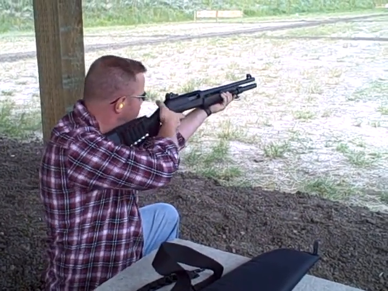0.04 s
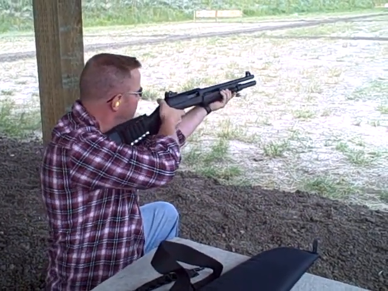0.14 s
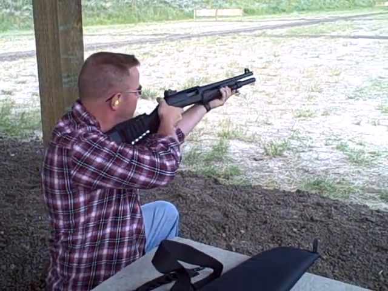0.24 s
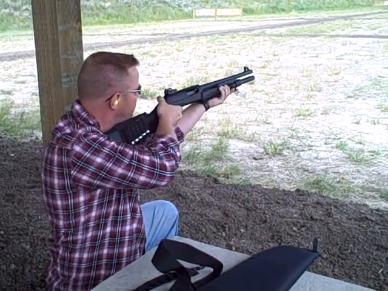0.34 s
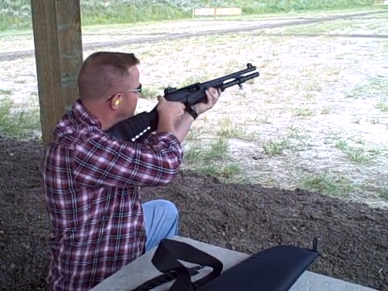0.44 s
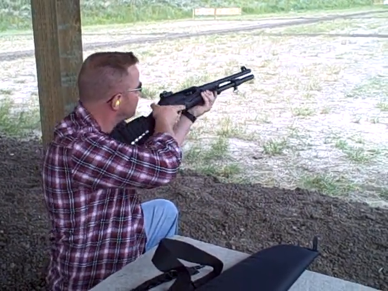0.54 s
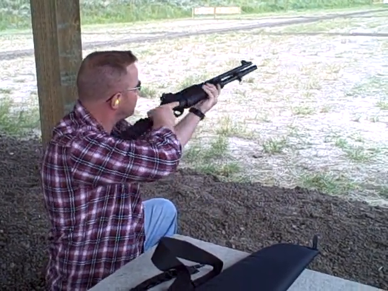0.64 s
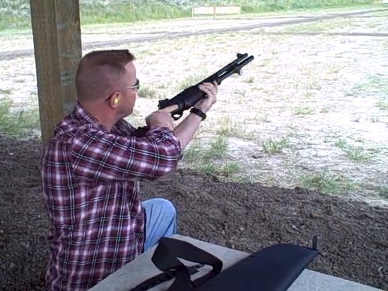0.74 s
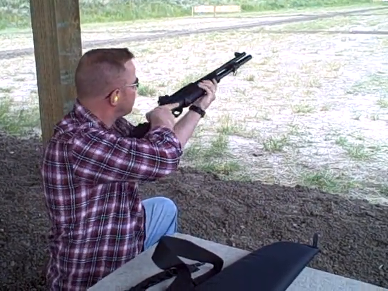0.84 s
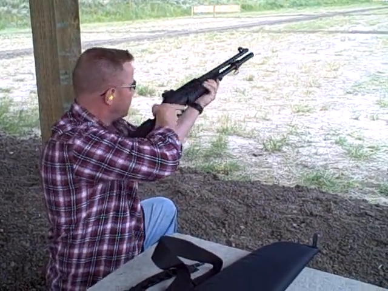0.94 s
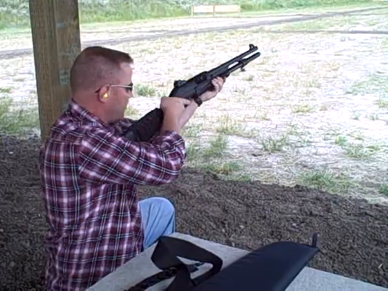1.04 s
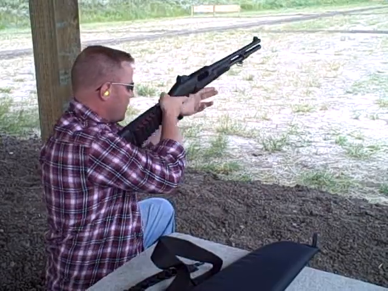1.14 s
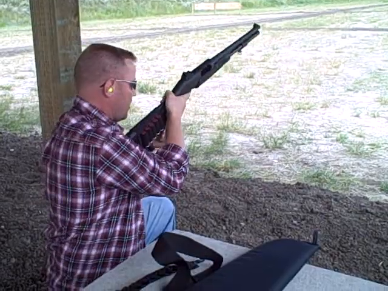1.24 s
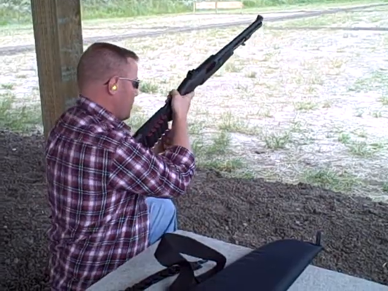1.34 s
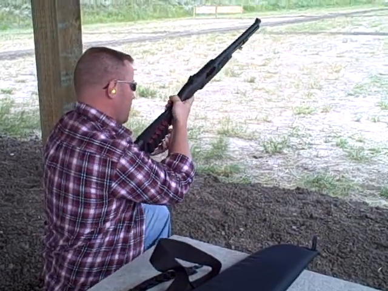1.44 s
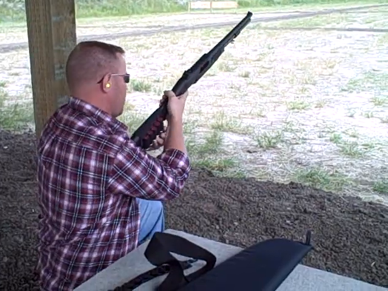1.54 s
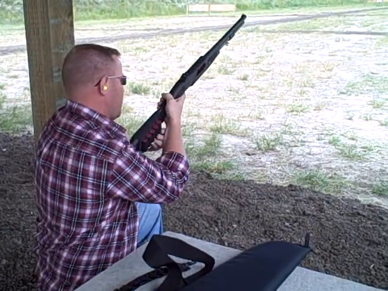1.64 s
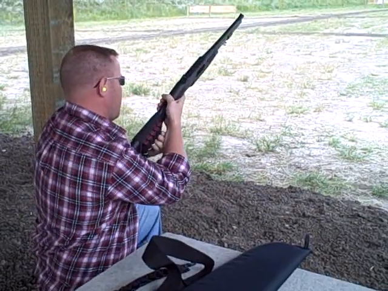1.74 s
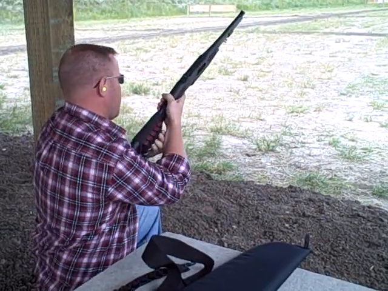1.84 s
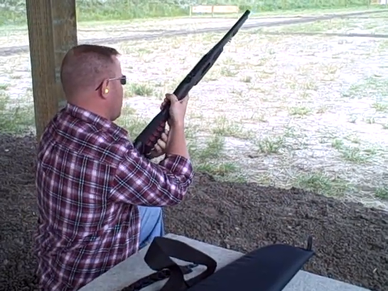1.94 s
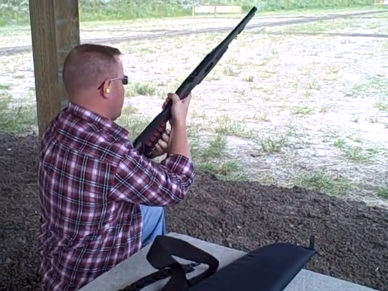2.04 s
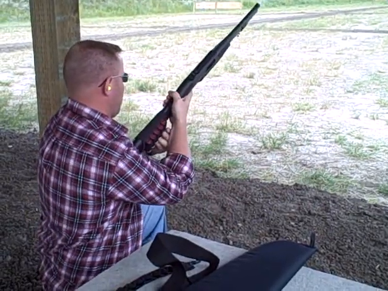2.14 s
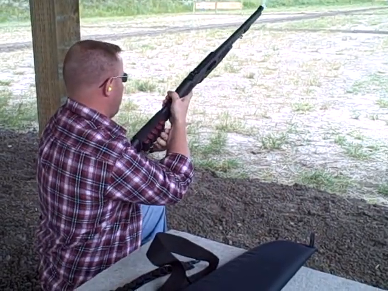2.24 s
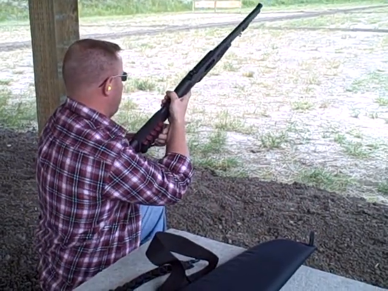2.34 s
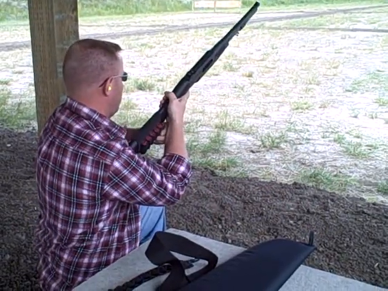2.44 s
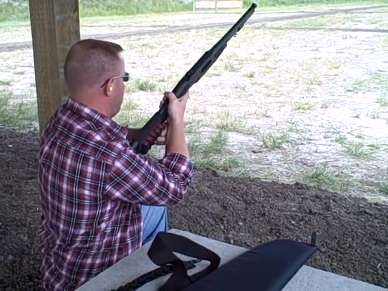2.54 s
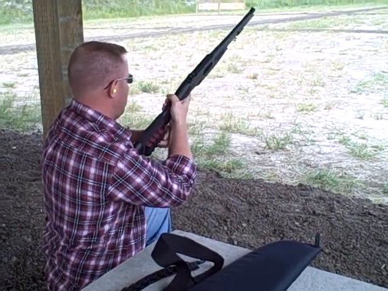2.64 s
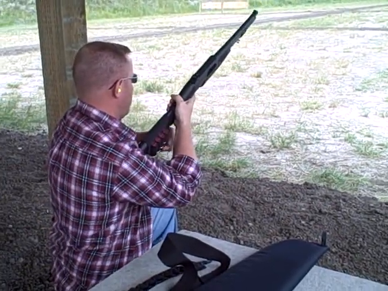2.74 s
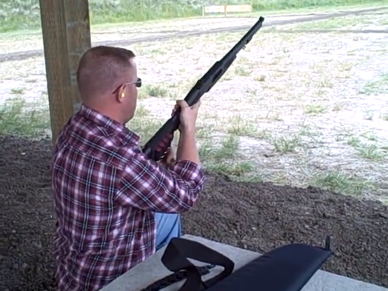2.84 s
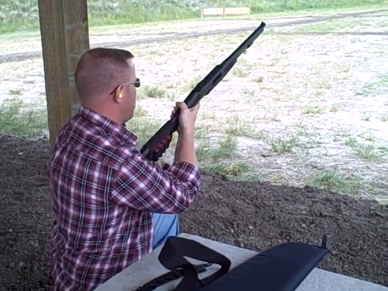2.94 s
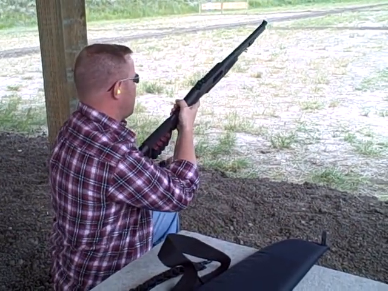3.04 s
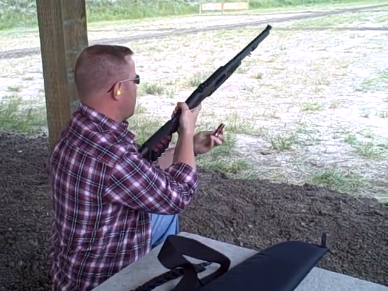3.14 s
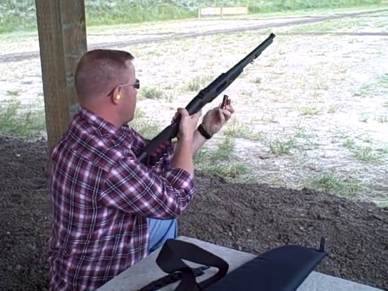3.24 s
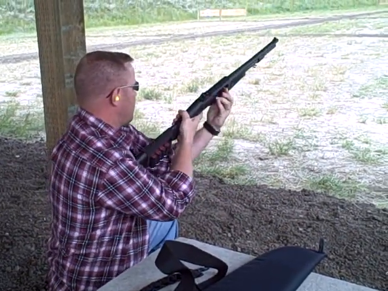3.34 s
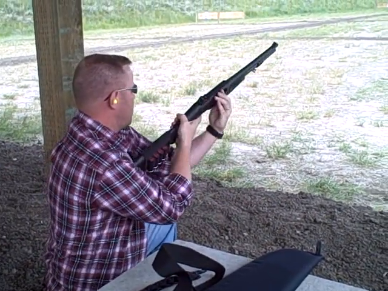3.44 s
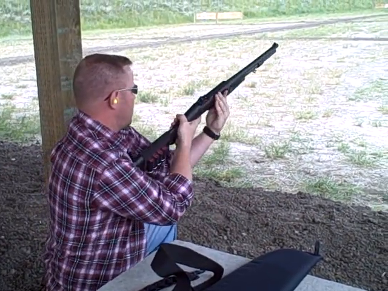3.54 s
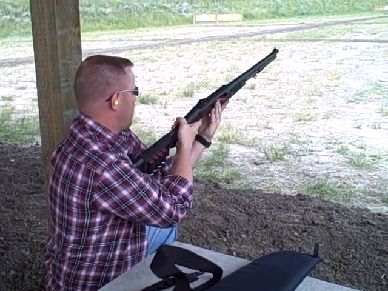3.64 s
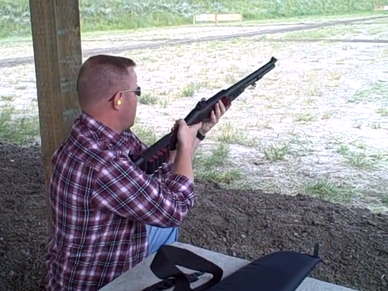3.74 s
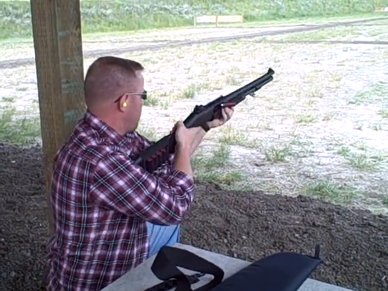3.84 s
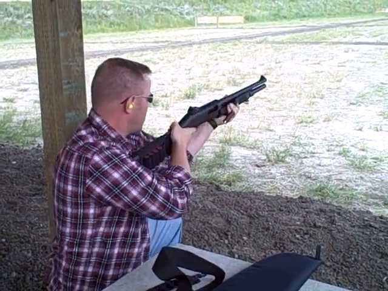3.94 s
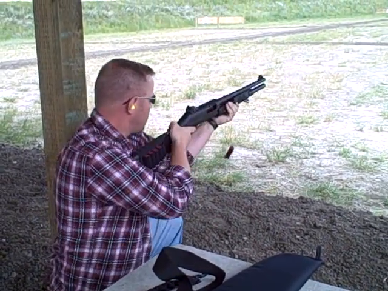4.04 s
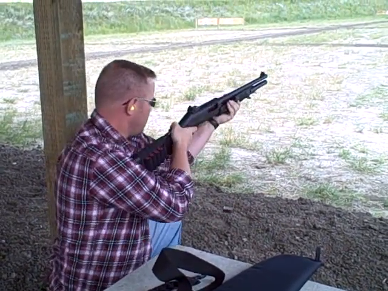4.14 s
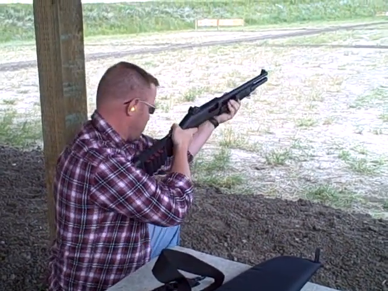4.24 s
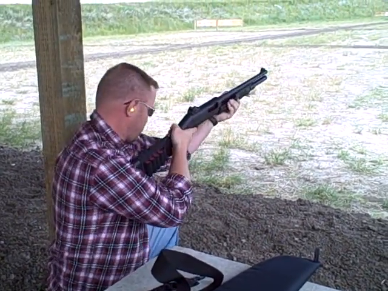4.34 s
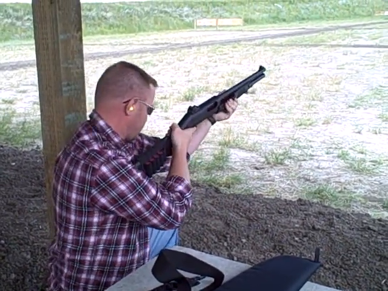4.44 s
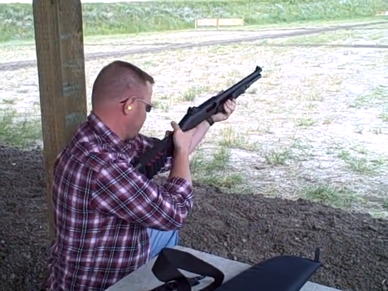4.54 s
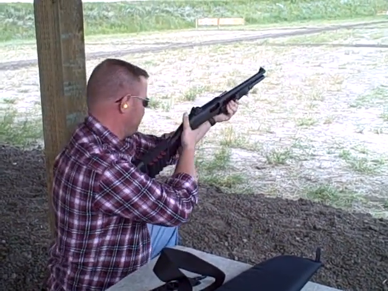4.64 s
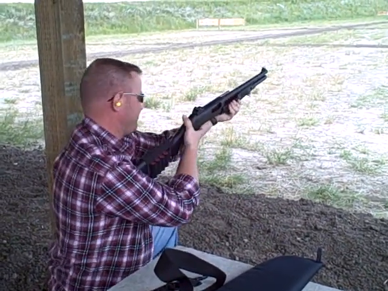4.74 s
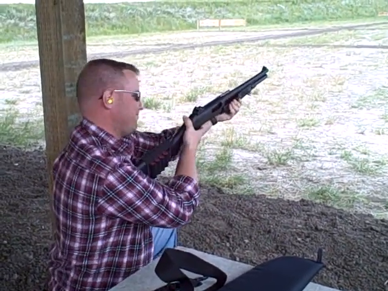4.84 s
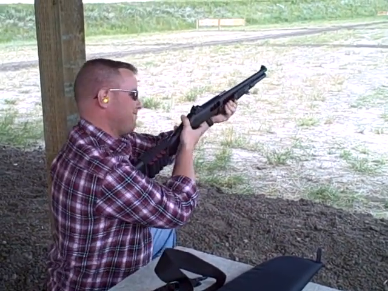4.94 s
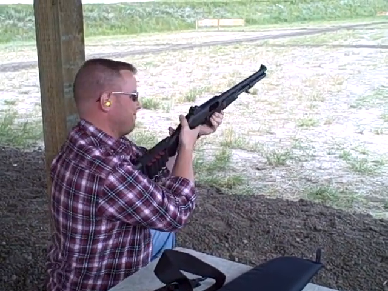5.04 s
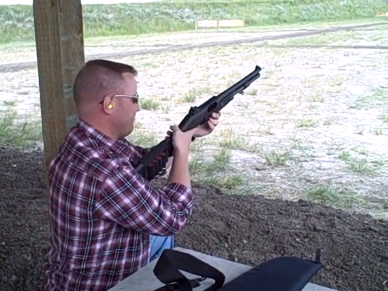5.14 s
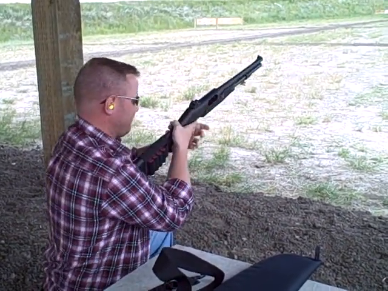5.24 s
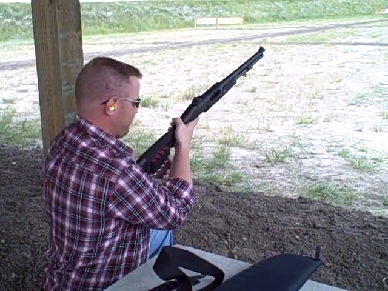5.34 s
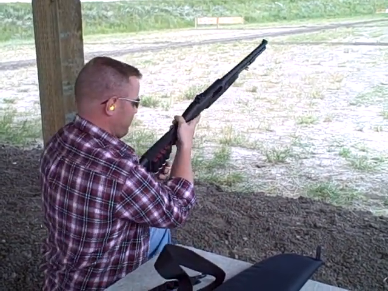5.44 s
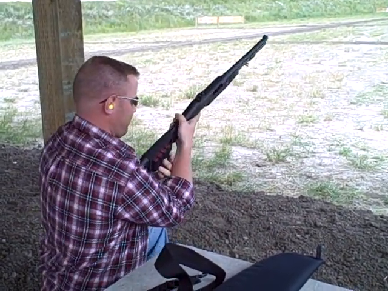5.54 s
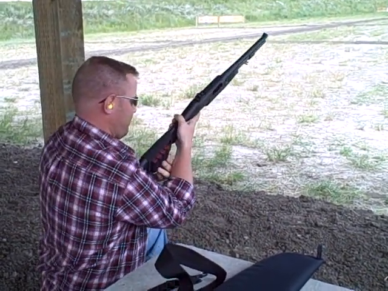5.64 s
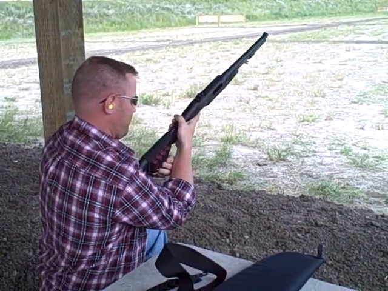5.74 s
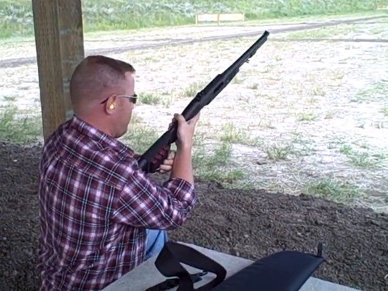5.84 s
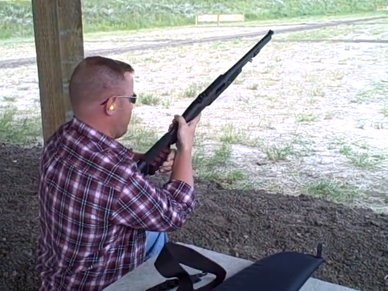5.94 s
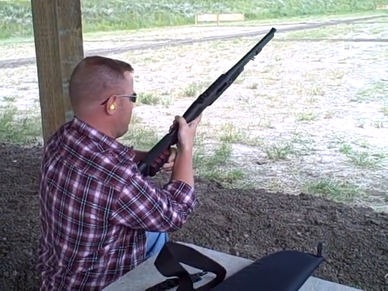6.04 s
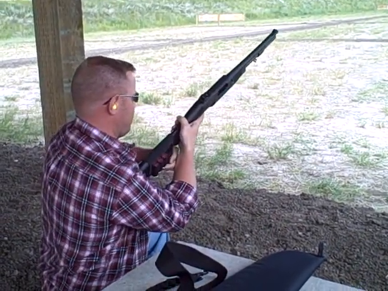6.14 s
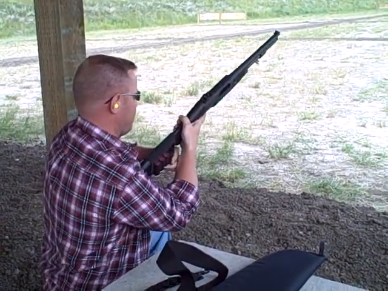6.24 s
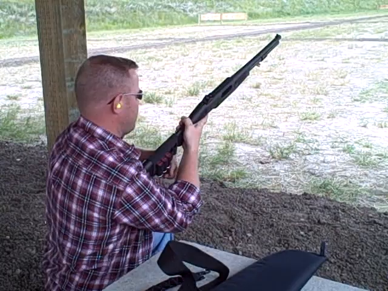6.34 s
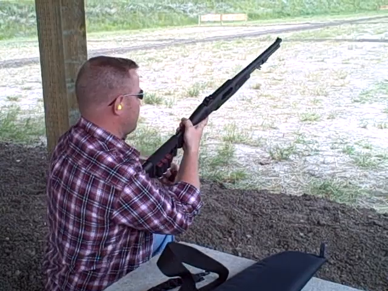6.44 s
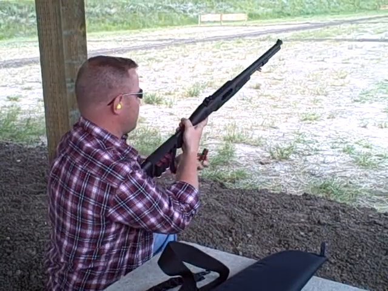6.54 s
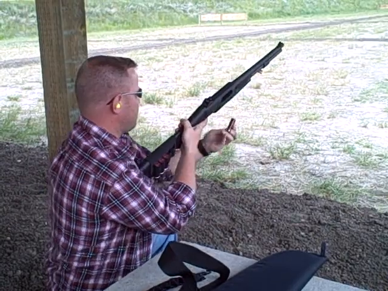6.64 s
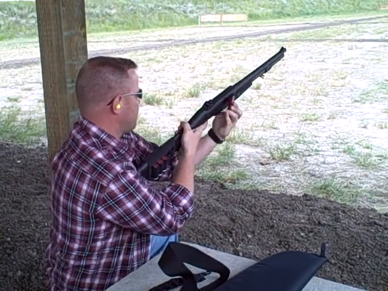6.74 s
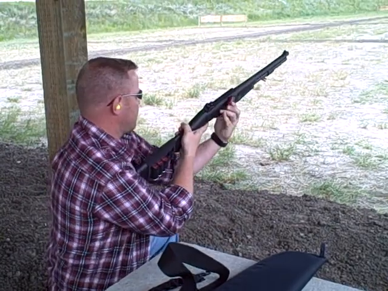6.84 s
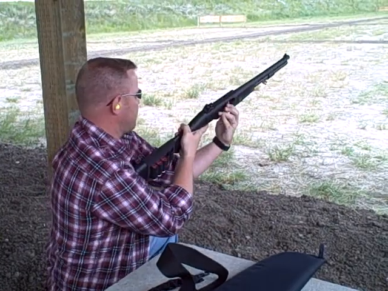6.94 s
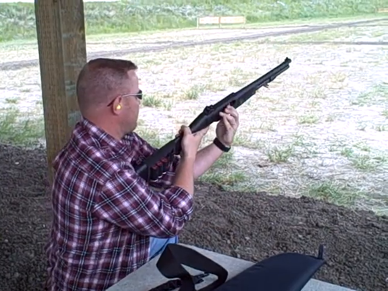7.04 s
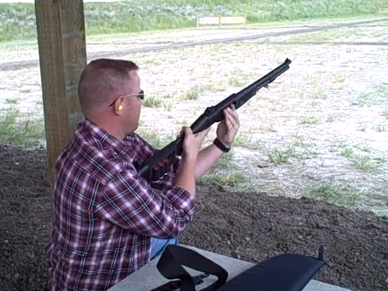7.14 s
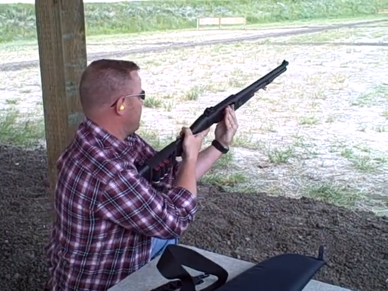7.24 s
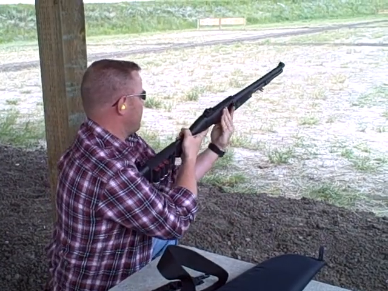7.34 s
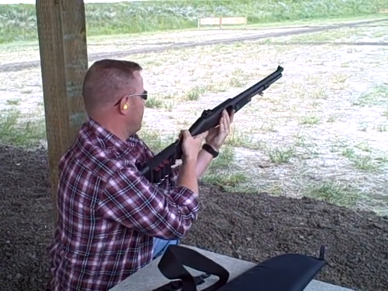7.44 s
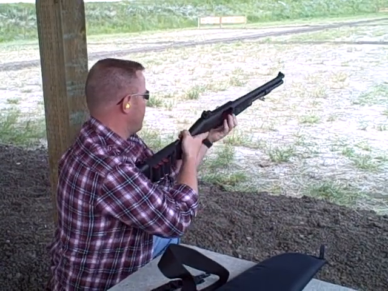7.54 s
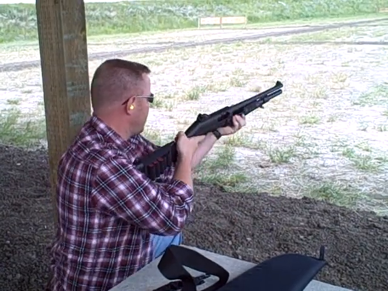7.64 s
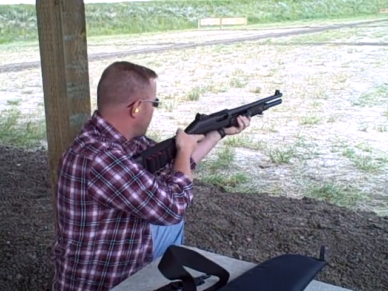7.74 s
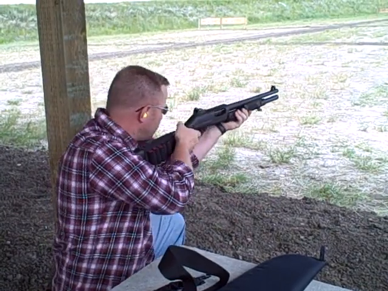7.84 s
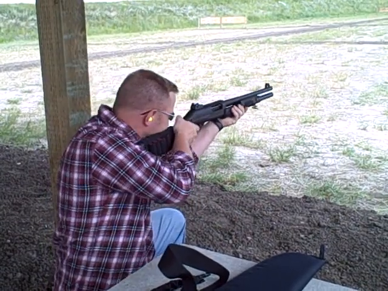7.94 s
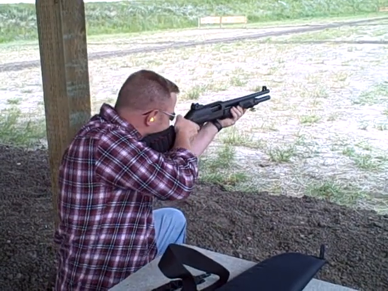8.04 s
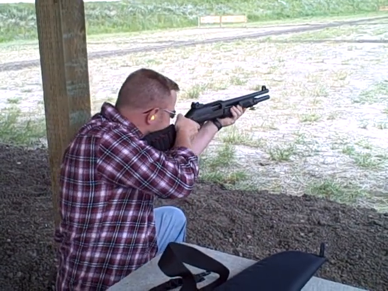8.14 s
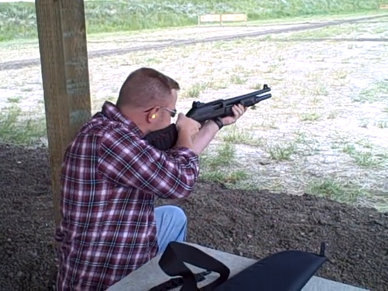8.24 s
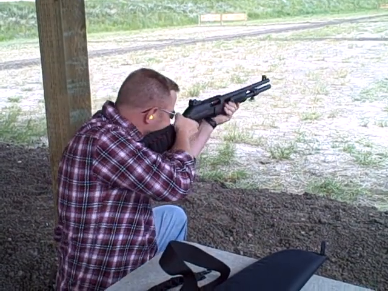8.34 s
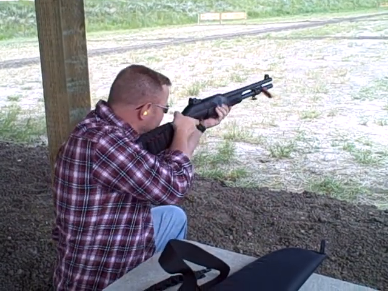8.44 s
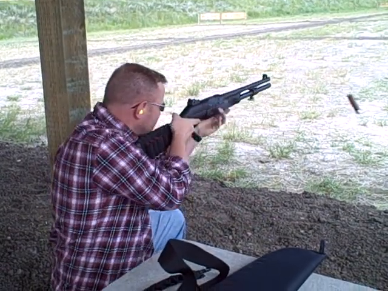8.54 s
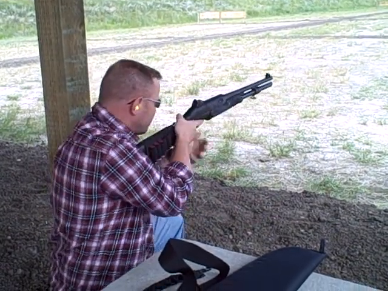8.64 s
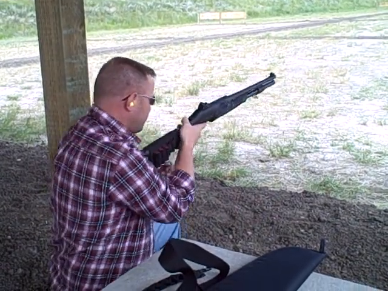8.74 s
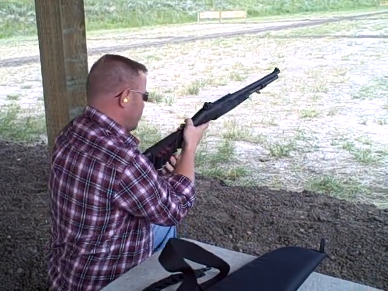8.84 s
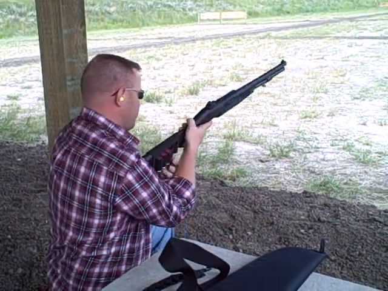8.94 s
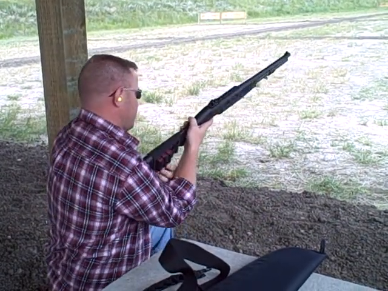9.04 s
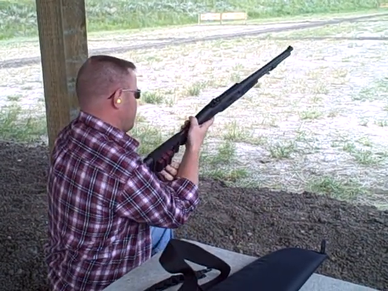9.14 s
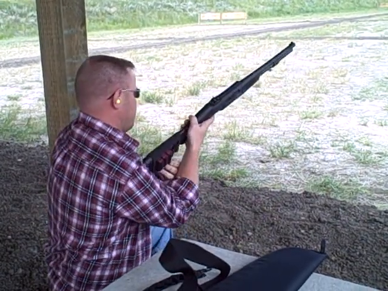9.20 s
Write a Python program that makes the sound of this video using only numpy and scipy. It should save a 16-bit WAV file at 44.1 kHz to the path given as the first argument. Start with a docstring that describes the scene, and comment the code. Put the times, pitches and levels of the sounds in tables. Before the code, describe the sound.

A shotgun is loaded and racked with steel clicks and fired twice at an outdoor range, while wind buffets the microphone.

```python
"""Rubbing and steel clicks: a pump shotgun is loaded, racked and fired under a wooden range shelter.
Each clack rings the gun and echoes off the roof. Gusts rumble and buffet the microphone.
Two near shots set the roof booming and clip the input; farther shots and echoes come in from the field.
A hollow shell taps three times at the end. Faint hiss and a wavering tone lie underneath."""
import sys
import numpy as np
from scipy import signal
from scipy.fft import rfft, irfft
from scipy.io import wavfile

SR = 44100
rng = np.random.default_rng(int(sys.argv[2]) if len(sys.argv) > 2 else 0)


def transcribe(signal):
    """Save signal, clipped to [-1, 1], as a 16-bit WAV file at the path in sys.argv[1]."""
    frames = np.atleast_2d(signal).T
    limited = np.clip(frames, -1, 1)
    pcm = np.round(limited * 32767).astype(np.int16)
    wavfile.write(sys.argv[1], SR, pcm)


N = 408807

# Levels are relative; each layer adds its own gain.
# hands, cloth and shells rubbing: t/s, length/s, level/dB, treble/dB
RUBS = [(0, 0.038, -70, -51), (4.204, 0.524, -78.5, -64), (1.58, 0.32, -67.5, -61), (4.054, 0.16, -67, -68),
        (5.189, 0.23, -74.5, -60), (5.5, 0.28, -80, -66), (6.146, 0.29, -78.5, -58),
        (6.846, 0.169, -64.5, -73), (7.326, 0.56, -59, -59), (7.839, 0.29, -74.5, -67.5)]
# diffuse wash spectrum: f/Hz, level/dB
WASH_SPECTRUM = [(400, -22.5), (800, 2.5), (1500, 4), (2500, 0.5), (5000, -3), (7000, -11), (16000, -58.5)]
# background hiss spectrum: f/Hz, level/dB
HISS_SPECTRUM = [(180, -42), (300, -0.5), (603, -27), (667, -2), (787, -8), (915, -9), (1430, -6),
                 (16000, -14.5)]
# deep wind rumble: t/s, level/dB
RUMBLE = [(0, -38.5), (.3, -52.5), (0.649, -41), (1.33, -24.5), (2.2, -31), (2.601, -44.5), (3.02, -33.5),
          (3.9, -29.5), (4.6, -34), (5.199, -33), (5.6, -26), (6.39, -22), (6.72, -40), (7.17, -30),
          (7.35, -29), (7.68, -51), (7.8, -29), (8.34, -39.5), (8.75, -61.5), (8.95, -47.5), (9.27, -55)]
# gust strength at the microphone: t/s, level/dB
GUSTS = [(0, -80), (.5, -71), (.65, -50), (.9, -64), (1.2, -26), (1.42, -38), (1.62, -19), (1.8, -29),
         (2.25, -26.5), (2.7, -48), (3.3, -42.5), (3.9, -46), (4.65, -39), (4.82, -28), (5.17, -39),
         (5.3, -25.5), (5.43, -32.5), (5.5, -24.5), (5.67, -27.5), (5.71, -40.5), (5.77, -26.5),
         (5.9, -27.5), (6.12, -13.5), (6.21, -25.5), (6.35, -19.5), (6.43, -29), (6.64, -32), (6.72, -39),
         (7.05, -35), (7.35, -38.5), (7.65, -51), (7.9, -51.5), (8.34, -59.5), (8.85, -50.5), (9.27, -80)]
# steel and shell clicks: t/s, level/dB, treble/dB (-12 = no tilt), peak f/Hz, t60/s, echo and ring send/dB
CLICKS = [(0.0578, -35.5, -23.5, 2130, 0.03, -22), (0.1331, -47, -10, 4130, 0.022, -16),
          (0.245, -57, -10, 5720, 0.03, 5), (0.3222, -37, -13, 2460, 0.056, -12),
          (.412, -47, -25.5, 2500, .02, -6), (0.4505, -34.5, -14, 4680, 0.048, 2),
          (0.4876, -39, -18, 3360, 0.12, -0.5), (0.5208, -11.5, -13.5, 1590, 0.041, -10),
          (0.5916, -32, -4, 11600, 0.04, -20), (1.4464, -17.5, -16, 1215, 0.0036, -14),
          (1.6045, -23.5, -26, 1450, 0.014, 2.5), (2.139, -44, -16, 2070, 0.045, -4),
          (3.361, -28.5, -19, 1520, 0.078, -25), (3.4172, -20.5, -24.5, 1970, 0.011, 2),
          (3.5404, -27, -25, 2640, 0.018, -10), (3.5793, -38, -14, 6200, 0.015, -7),
          (3.5874, -49, -15, 1210, 0.02, -6), (3.601, -32.5, -27.5, 1480, 0.017, 6.5),
          (3.623, -30, -32, 1300, 0.021, 1), (3.6653, -29.5, -25, 1300, 0.12, -10),
          (3.7186, -27.5, -16.5, 4730, 0.019, -6), (3.7624, -35.5, -18, 1390, 0.018, 4),
          (3.8348, -9, -4.5, 4660, 0.0094, 3.5), (3.889, -32, -17, 4360, 0.041, -13),
          (3.8999, -15, -17, 2880, 0.011, 2), (3.9145, -18, -25, 2460, 0.16, -32),
          (3.925, -8, -4, 2460, 0.02, -5.5), (3.9533, -23, -23.5, 3570, 0.021, 14.5),
          (3.9846, 2, -11.5, 1582, 0.016, -0.5), (3.9952, -10, -20.5, 2940, 0.114, -25),
          (4.144, -33, -20, 2550, 0.035, -4), (4.177, -27, -16.5, 1680, 0.041, -11),
          (4.375, -21, -13.5, 2350, 0.033, -6), (4.4064, -32.5, -14, 10400, 0.022, 6),
          (4.417, -21.5, -1, 8720, 0.024, -23), (4.4787, -18.5, -13.5, 2260, 0.043, -11),
          (4.9397, -9.5, -7, 2430, 0.026, -9.5), (5.0114, -17, -15, 3140, 0.016, 2),
          (5.027, -16.5, -13.5, 4200, 0.058, -8), (5.0573, -16.5, -14, 2000, 0.085, -1.5),
          (5.0933, 1.5, -14.5, 6300, 0.039, -4.5), (5.1054, 0, -11, 3840, 0.043, -34),
          (5.378, -49.5, -18, 2500, .03, -1.5), (5.7846, -35, -2.5, 1207, 0.032, -4.5),
          (6.198, -34.5, -20, 1900, 0.037, -5), (6.8401, -19.5, -17, 1200, 0.025, -4),
          (6.92, -26, -21, 1250, 0.019, 7), (7.0236, -24, -25, 2230, 0.013, -2),
          (7.1615, -40, -15.5, 2016, 0.023, -2), (7.348, -35, -25, 2500, 0.033, -1),
          (7.4142, -22.5, -20, 4700, 0.025, -8.5), (7.449, -26, -25.5, 1250, 0.06, -1),
          (7.4557, -26, -24, 1290, 0.015, -13), (7.4983, -15.5, -12.5, 4370, 0.036, -10),
          (7.5378, -13, -25.5, 4400, 0.02, 1), (7.6667, -17.5, -5, 4330, 0.021, 2),
          (7.673, -16, -23, 2370, 0.087, -2.5), (7.6894, -10.5, -16.5, 4800, 0.037, -2),
          (7.7216, -13, -17, 2630, 0.051, -23), (7.7318, -4, -12.5, 4630, 0.024, 3),
          (7.7463, 3, -13, 1480, 0.067, -9.5), (7.7542, 5, -16, 9200, 0.012, -11),
          (7.947, -44.5, -17, 3500, 0.022, -4), (8.05, -48, -10, 5000, 0.032, -5),
          (8.321, -26, -14, 3140, 0.015, -1), (9.0426, -23, 1.5, 4600, 0.01, -1.5)]
# click and scrape spectrum: f/Hz, level/dB
STEEL_SPECTRUM = [(180, -31.5), (300, -15.5), (502, -37), (565, -11.5), (1250, -6), (1480, -3.5),
                  (1870, -4), (3030, -1.5), (8640, -2.5), (16000, -14.5)]
# gun modes: f/Hz, level/dB, t60/s
GUN_MODES = [(610, -8, .07), (794, -4, 0.069), (1170, -6, .18), (1304, -7, .12), (1630, -5.5, 0.073),
             (2760, -7, .06), (3090, -8.5, 0.051), (4330, -8, 0.15), (4850, -7, 0.17), (8600, -5.5, .04),
             (11600, -10, 0.15)]
# fore-end strokes: t/s, length/s, level/dB
SLIDES = [(.43, .19, -49), (3.88, .14, -38.5), (4.99, .13, -44.5), (7.66, .13, -41)]
# single wind flaps: t/s, level/dB, f/Hz, crackle/dB
FLAPS = [(0.647, -25, 126, -66), (0.891, -26, 242, -59), (0.922, -30.5, 283, -55),
         (0.977, -17.5, 106, -31.5), (1.028, -16.5, 145, -33.5), (1.102, -15.5, 180, -38.5),
         (1.295, -6.5, 133, -33), (1.344, -13, 118, -28), (1.518, -16.5, 185, -42),
         (1.587, -1.5, 129.6, -26), (1.647, -13, 363, -15), (1.689, -9, 155, -24), (1.757, -13, 205, -13.5),
         (1.864, -10.5, 178, -27), (1.895, -9, 121, -17.5), (1.936, -11, 110, -34),
         (2.001, -19.5, 115, -46), (2.057, -10.5, 169, -35), (2.111, -6, 151, -26), (2.217, -2.5, 180, -22),
         (2.896, -31, 118, -66.5), (3.066, -25, 109, -61), (3.331, -20, 202, -50), (3.416, -24, 165, -52),
         (4.715, -26, 130, -30.5), (4.829, -21, 136, -37), (5.066, -12, 160, -35),
         (5.465, -10.5, 245, -41.5), (5.513, -6, 156, -32.5), (5.549, -5, 258, -25), (5.59, -11, 140, -35),
         (5.638, -12, 238, -43), (5.749, -3, 127.6, -29.5), (6.023, -14.5, 213, -26),
         (6.077, -20, 240, -18.5), (6.124, -6.5, 174, -23.5), (6.227, -18.5, 151, -40.5),
         (6.282, -12, 170, -29.5), (6.307, -7, 113.5, -25), (6.349, -4.5, 143, -15.5),
         (6.388, -9, 110, -30), (6.454, -19.5, 210, -36.5), (6.48, -13.5, 242, -41.5),
         (6.821, -16.5, 167, -43), (6.915, -18, 149, -48), (6.937, -14, 202, -36), (6.999, -22, 172, -42),
         (7.348, -11, 125.4, -29.5), (7.96, -28.5, 142, -66), (8.002, -26, 178, -60),
         (8.104, -24.5, 135, -71), (8.194, -31.5, 140, -75)]
# near shots: t/s, level/dB, bass lift/dB, decay factor, rise factor
SHOTS = [(2.2677, 0, 3.5, 0.96, 0.11), (8.3631, 4, 2, 0.93, 1.01)]
# blast spectrum: f/Hz, level/dB
BLAST_SPECTRUM = [(35, -66), (60, -36.5), (118, -4.5), (160, -10), (330, -1), (427, -9.5), (862, -8),
                  (1280, -18), (2140, -17), (11500, -29.5), (16000, -44.5)]
# blast decay before the shot's factor: f/Hz, t60/s
BLAST_T60 = [(80, 0.75), (210, 0.46), (560, 0.39), (1470, 0.32), (3880, 0.25), (10200, 0.23)]
# blast swell before the shot's factor, bass last: f/Hz, rise/s
BLAST_RISE = [(100, 0.028), (400, 0.022), (1500, 0.0052), (6000, 0.00077)]
# shelter roof modes, led by a deep recoil of the microphone diaphragm: f/Hz, level/dB, t60/s
BOOM_MODES = [(26.7, -14, .3), (117, -16.5, .7), (135, -17, 0.95), (205, -26, .7), (339.4, -10, 0.16)]
# echoes and far shots: t/s, level/dB, f/Hz, t60/s, wash level/dB, wash treble/dB, wash t60/s
CRACKS = [(2.457, -9, 3200, 0.0063, -47, -58, 0.72), (2.4797, -16.5, 2380, 0.01, -62, -50, 0.94),
          (2.6531, -10.5, 4430, 0.02, -56.5, -64, 0.73), (3.138, -21.5, 2820, 0.026, -58, -82, .25),
          (3.168, -23.5, 2530, 0.0083, -50, -85, 0.2), (4.7053, -12.5, 1620, 0.0085, -52.5, -49.5, 0.79),
          (5.9589, -16, 1680, 0.023, -51, -49, 0.75), (6.7167, -14.5, 1380, 0.0094, -51, -49.5, 0.65),
          (8.4542, -1, 5920, .016, -50, -52, 1)]
# first shot rolling back across the field: t/s, length/s, level/dB, treble/dB
ROLLS = [(2.598, 0.707, -68, -92), (3.128, 0.182, -70, -88)]
# hollow shell modes: f/Hz, level/dB, t60/s
SHELL_MODES = [(1287, -48, 0.078), (4560, -45, 0.035), (5950, -46.5, 0.032)]
# shell taps: t/s, level/dB
SHELL_TAPS = [(9.0406, -5), (9.054, 3.5), (9.12, -12.5)]


def gain_of(db):
    """Decibels to a factor."""
    return 10 ** (np.asarray(db) / 20)


def unit_rms(x):
    """Scales to rms 1."""
    return x / np.sqrt(np.mean(x ** 2) + 1e-20)


def lookup(table, hz):
    """Table value at hz, interpolated over log frequency."""
    f, value = np.transpose(table)
    return np.interp(np.log(hz + 1), np.log(f + 1), value)


def add(mix, at_s, sound):
    """Mixes a sound in at at_s."""
    part = mix[round(at_s * SR):][:len(sound)]
    part += sound[:len(part)]


def shaped(x, db_at):
    """Filters x by a function from Hz to dB; rms 1."""
    return unit_rms(irfft(rfft(x) * gain_of(db_at(np.fft.rfftfreq(len(x), 1 / SR))), len(x)))


def band(hz, centre_hz, below_db_oct, above_db_oct):
    """Band response in dB, one slope each side."""
    octaves = np.log2((hz + 1) / centre_hz)
    return np.where(octaves < 0, below_db_oct * octaves, -above_db_oct * octaves)


def wander(rate_hz, depth_db):
    """Random gain moving at about rate_hz; rms 1."""
    drift = shaped(rng.standard_normal(N), lambda hz: band(hz, rate_hz, 0, 7.026))
    return unit_rms(gain_of(depth_db * drift))


def contour(table):
    """Gain through points of t/s, level/dB."""
    return gain_of(np.interp(np.arange(N) / SR, *np.transpose(table)))


def strokes(rows, shape):
    """Gain from rows of t/s, length/s, level/dB; shape maps progress 0-1 to a gain."""
    out = np.zeros(N)
    for at_s, length_s, db in rows:
        add(out, at_s, gain_of(db) * shape(np.linspace(0, 1, round(length_s * SR))))
    return out


def ringing(modes, length_s):
    """Impulse response of damped modes."""
    t = np.arange(round(length_s * SR)) / SR
    return sum(gain_of(db - 60 * t / t60_s) * np.sin(2 * np.pi * hz * t) for hz, db, t60_s in modes)


def wash_gain(clatter, column, return_db, return_t60_s=0.25, fade_share=0.13):
    """Power sum of rubs, rolls, crack tails and returned clatter; column 0 dull, 1 treble."""
    t = np.arange(SR) / SR
    rows = [(at_s, length_s, levels_db[column]) for at_s, length_s, *levels_db in RUBS + ROLLS]
    power = strokes(rows, lambda u: np.minimum(np.minimum(u, 1 - u) * 2 / fade_share, 1)) ** 2
    for at_s, _, _, _, *levels_db, t60_s in CRACKS:
        add(power, at_s, (gain_of(levels_db[column] - 60 * t / t60_s) * (1 - t)) ** 2)
    field_decay = gain_of(return_db - 60 * t / return_t60_s)
    power += abs(signal.oaconvolve(clatter ** 2, field_decay ** 2)[:N])
    return np.sqrt(power)


def rubs_and_field(clatter):
    """Near rubbing and the field's diffuse returns: dull noise plus a thinner treble band."""
    dull = shaped(rng.standard_normal(N) * wander(44, 0.79), lambda hz: lookup(WASH_SPECTRUM, hz))
    treble = shaped(rng.standard_normal(N) * wander(60, 1.4), lambda hz: band(hz, 14000, 4.5, 15))
    dull *= wash_gain(clatter, column=0, return_db=-47)
    treble *= wash_gain(clatter, column=1, return_db=-49)
    return gain_of(6.5) * dull + gain_of(-8.5) * treble


def background(hiss_db=-75, tone_db=-80, tone_hz=672):
    """Faint hiss and a tone, both wavering in level."""
    hiss = shaped(rng.standard_normal(N) * wander(6, 3), lambda hz: lookup(HISS_SPECTRUM, hz))
    tone = wander(5, 3.5) * np.sin(2 * np.pi * tone_hz * np.arange(N) / SR)
    return gain_of(hiss_db) * hiss + gain_of(tone_db) * tone


def rustle(scuffs_per_s=14, rise_s=0.004, level_db=-75.5):
    """Sparse scuffs of cloth, sling and fingers."""
    scuffs = (rng.random(N) < scuffs_per_s / SR) * gain_of(3 * np.minimum(rng.exponential(1, N), 2))
    u = np.arange(2048) / SR / rise_s
    envelope = signal.oaconvolve(scuffs, u * np.exp(1 - u))[:N]
    return gain_of(level_db) * shaped(envelope * rng.standard_normal(N), lambda hz: band(hz, 5100, 5.4, 4.2))


def wind(eddies_per_s=600, stir_db=-15, stir_s=0.012):
    """Turbulence: deep rumble and clumped eddies that thump, gaining an edge as they grow."""
    rumble = shaped(rng.standard_normal(N), lambda hz: band(hz, 58, 0.73, 14))
    size = np.minimum(rng.exponential(1, N), 4)
    eddies = (rng.random(N) < eddies_per_s / SR) * rng.choice([-1., 1.], N) * wander(22, 3.7)
    buffet = shaped(eddies * gain_of(0.5 * size), lambda hz: band(hz, 190, 6.8, 8.8) - hz / 15.6)
    edge = shaped(eddies * gain_of(1.9 * size), lambda hz: band(hz, 330, 42, 8.6) - hz / 52)
    strength = contour(GUSTS) * wander(7.4, 3.2)
    u = np.arange(8192) / SR / stir_s
    for at_s, db, *_ in FLAPS:  # each flap briefly stirs the buffeting
        add(strength, max(at_s - stir_s, 0), gain_of(db + stir_db) * u * np.exp(1 - u))
    rumble *= contour(RUMBLE) * wander(2, 1.2)
    buffet *= gain_of(1.5) * strength
    edge *= gain_of(-2.5) * strength ** 1.46 * wander(30, 0.68)
    return rumble + buffet + edge


def clicks(rise_s=0.0011, peak_db=6, peak_width_oct=0.22):
    """Steel and shells striking: short noise bursts. Returns direct sound and the echo and ring send."""
    direct, send = np.zeros(N), np.zeros(N)
    t = np.arange(4096) / SR
    for at_s, db, treble_db, peak_hz, t60_s, send_db in CLICKS:
        def spectrum_db(hz):
            tilt = 0.44 * (treble_db + 12) * np.log2((hz + 1) / 3000)
            peak = peak_db * np.exp(-(np.log2((hz + 1) / peak_hz) / peak_width_oct) ** 2)
            return lookup(STEEL_SPECTRUM, hz) + tilt + peak
        envelope = gain_of(db - 5 - 60 * t / max(t60_s, 0.004)) * np.minimum(t / rise_s, 1)
        click = envelope * shaped(rng.standard_normal(len(t)), spectrum_db)
        add(direct, at_s, click)
        add(send, at_s, gain_of(send_db) * click)
    return direct, send


def gun_ring(blows, level_db=-11):
    """Blows and scrapes excite the gun's modes."""
    response = ringing(GUN_MODES, 0.29)
    return gain_of(level_db) * signal.oaconvolve(blows, response / np.linalg.norm(response))[:N]


def shelter(sound, roof_delay_s=0.0115):
    """One roof echo among scattered reflections; treble lasts longest."""
    taps = np.zeros(16000)
    slots = np.arange(200, 15980, 20)
    taps[slots + rng.integers(0, 20, len(slots))] = rng.choice([-1., 1.], len(slots))
    taps[round(roof_delay_s * SR)] = 4.5
    hz, t, spectra = signal.stft(taps, SR, nperseg=256)
    t60_s = lookup([(500, 0.043), (3000, 0.077), (12000, 0.23)], hz)
    tail = signal.istft(spectra * gain_of(-60 * t / t60_s[:, None]), SR, nperseg=256)[1]
    return signal.oaconvolve(sound, tail / np.linalg.norm(tail))[:N]


def slide(swell_db=11):
    """The fore-end scrapes along its steel bars: clumped grit, pressed harder toward the end."""
    grit = rng.standard_normal(N) * wander(220, 6.6)
    push = strokes(SLIDES, lambda u: gain_of(swell_db * (u - 2)) * np.minimum(30 * np.minimum(u, 1 - u), 1))
    return push * shaped(grit, lambda hz: lookup(STEEL_SPECTRUM, hz))


def wind_flaps():
    """Single flaps at the microphone: one pressure swing, then crackle."""
    out, t = np.zeros(N), np.arange(2048) / SR
    crackle_envelope = t / 0.0057 * np.exp(1 - t / 0.0045)
    for at_s, db, hz, crackle_db in FLAPS:
        cycles = np.arange(-1.2 * SR / hz, 1.2 * SR / hz) * hz / SR
        add(out, at_s, -gain_of(db) * np.sin(2 * np.pi * cycles) * np.exp(-(cycles / 0.43) ** 2))
        crackle = shaped(rng.standard_normal(len(t)), lambda f: band(f, 690, 1.1, 5.7) - f / 60)
        add(out, at_s, gain_of(crackle_db) * crackle * crackle_envelope)
    return out


def shot(db, bass_db, decay_factor, rise_factor):
    """Dense blast reflections, each half octave swelling and dying at its own rate; the roof booms and the
    microphone diaphragm recoils."""
    t = np.arange(SR) / SR
    hz = np.fft.rfftfreq(SR, 1 / SR)
    spectrum = rfft(shaped(rng.standard_normal(SR), lambda f: lookup(BLAST_SPECTRUM, f) + bass_db * (f < 500)))
    blast = np.zeros(SR)
    for centre_hz in 40 * 2 ** (np.arange(18) / 2):
        share = np.clip(1 - abs(2 * np.log2((hz + 1) / centre_hz)), 0, 1)
        swell = (1 - np.exp(-t / (rise_factor * lookup(BLAST_RISE, centre_hz)))) ** 2
        swell *= 1 + 0.94 * np.exp(-t / 0.015) * (centre_hz > 1000)  # brighter onset
        decay = gain_of(-60 * t / (decay_factor * lookup(BLAST_T60, centre_hz)))
        blast += irfft(spectrum * share, SR) * swell * decay
    boom = ringing(BOOM_MODES, 1) * (1 - np.exp(-t / (rise_factor * 0.04)))
    return gain_of(db) * (gain_of(3.5) * blast + gain_of(1.5) * boom)


def far_cracks():
    """Echoes and far shots: dry snaps dulled by distance."""
    out, t = np.zeros(N), np.arange(4096) / SR
    for at_s, db, hz, t60_s, *_ in CRACKS:
        snap = shaped(rng.standard_normal(len(t)), lambda f: band(f, hz, 8.7, 30))
        add(out, at_s, snap * gain_of(db - 11.5 - 60 * t / t60_s))
    return out


def shell_taps():
    """A hollow shell rings at each tap."""
    out = np.zeros(N)
    for at_s, db in SHELL_TAPS:
        add(out, at_s, gain_of(db) * ringing(SHELL_MODES, 0.12))
    return out


def scene():
    """Gun, shelter, field, wind and background; mono."""
    clatter, send = clicks()
    scrape = slide()
    send += gain_of(1.5) * scrape
    ring = gun_ring(send)
    mix = clatter + scrape + ring + shelter(send + ring)
    mix += far_cracks() + rustle() + rubs_and_field(clatter) + wind() + wind_flaps() + shell_taps()
    for at_s, *settings in SHOTS:
        add(mix, at_s, shot(*settings))
    return (mix + background())[None]


def record(dry):
    """The input stage clips on the shots; coupling blocks slow drift; a low-pass limits the band."""
    ceiling, coupling_hz, cutoff_hz = 0.72, 11, 15900
    clipped = dry / (1 + abs(dry / ceiling) ** 8) ** (1 / 8)
    coupled = signal.lfilter(*signal.butter(1, coupling_hz, "high", fs=SR), clipped)
    lowpass = signal.firwin(511, cutoff_hz, window=("kaiser", 9), fs=SR)
    return signal.oaconvolve(coupled, lowpass[None], "same")


dry = scene()
out = record(dry)
transcribe(out)
```